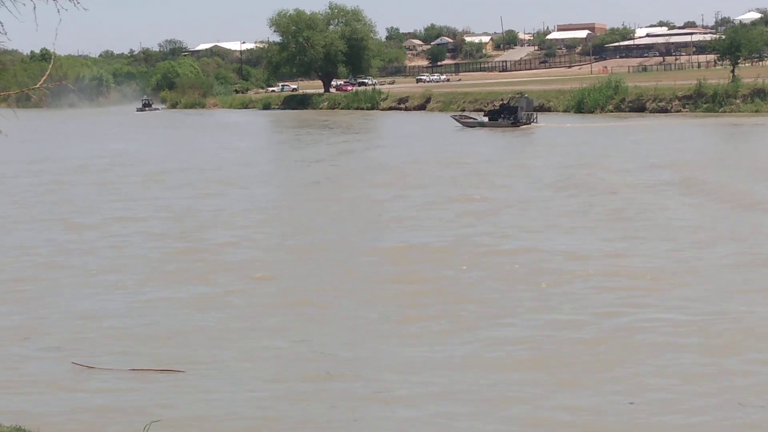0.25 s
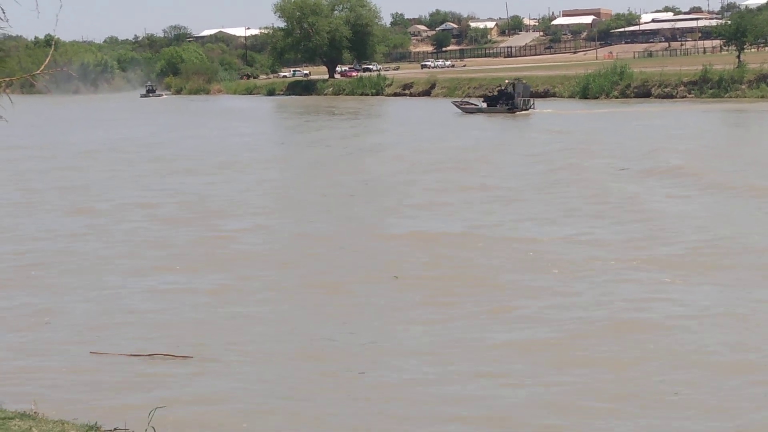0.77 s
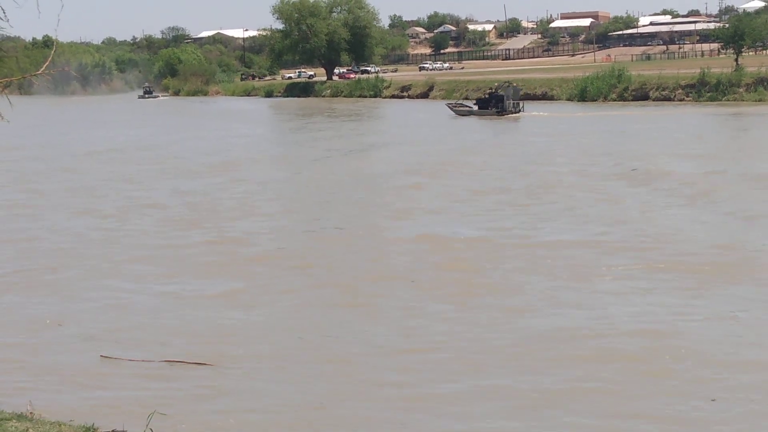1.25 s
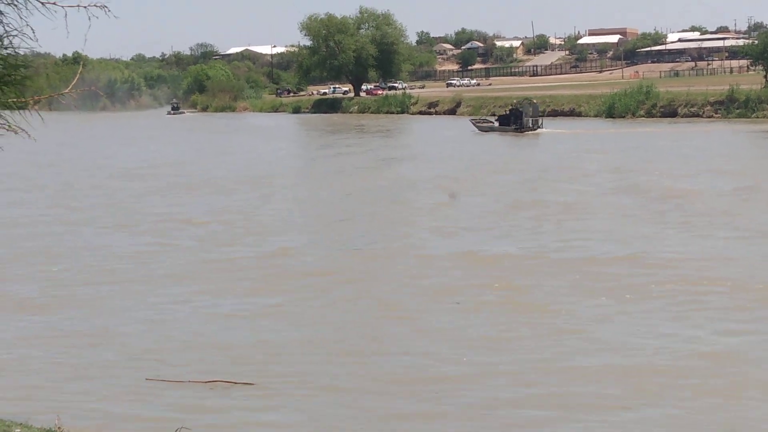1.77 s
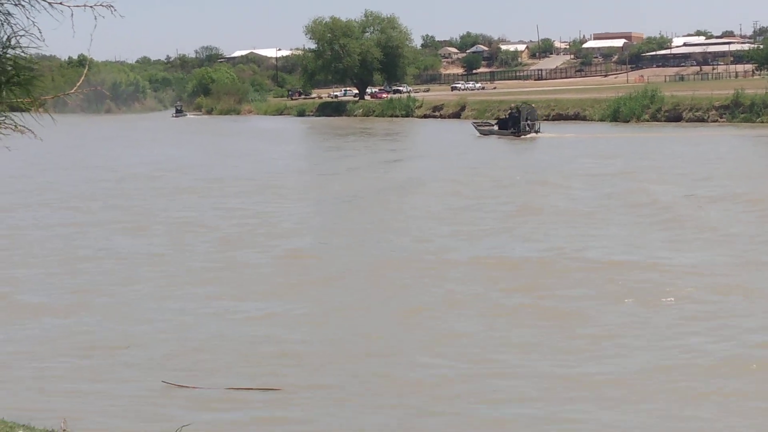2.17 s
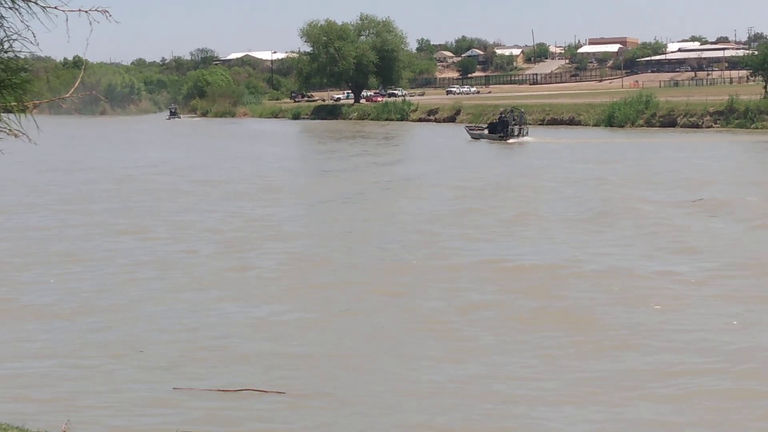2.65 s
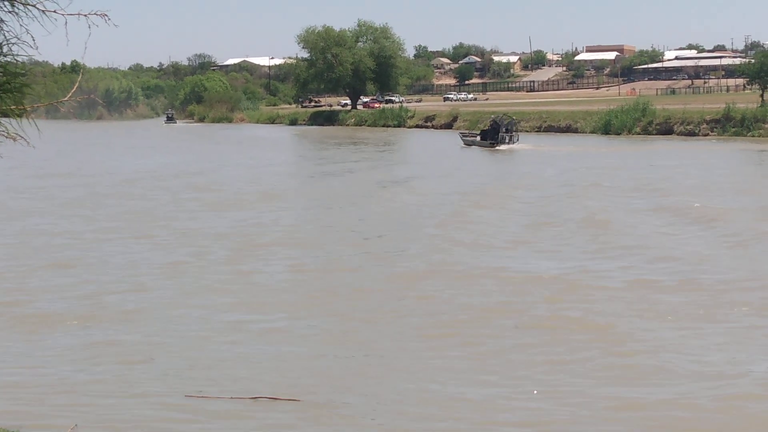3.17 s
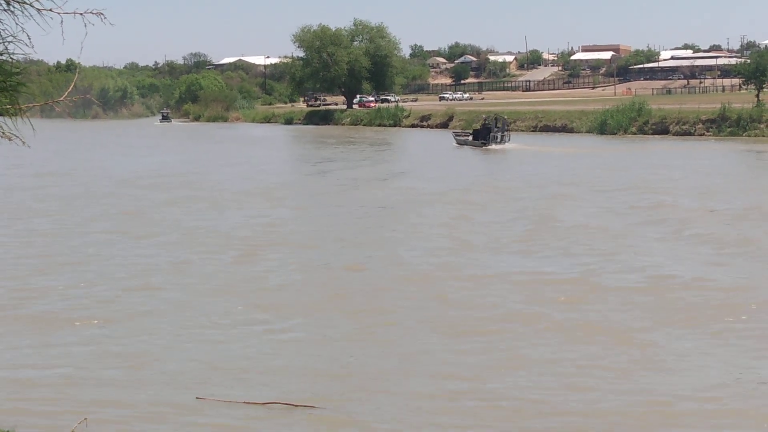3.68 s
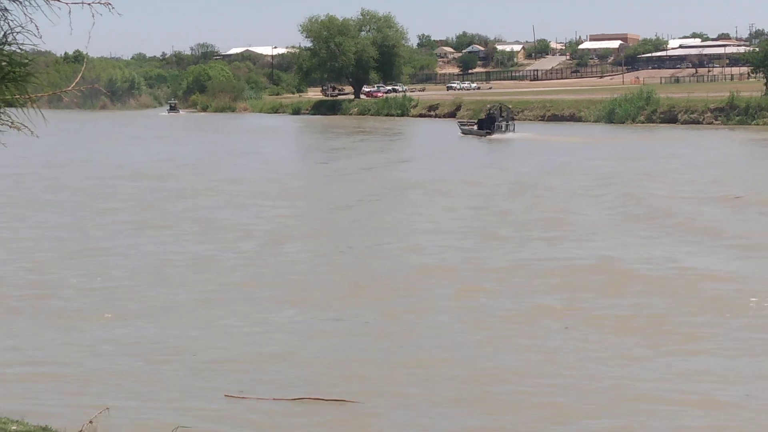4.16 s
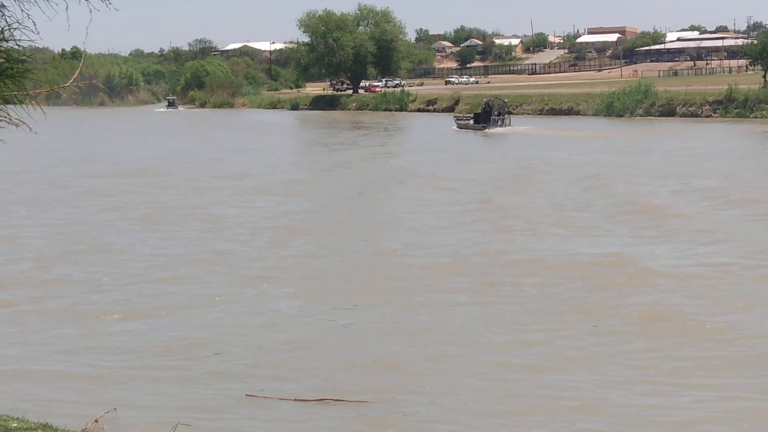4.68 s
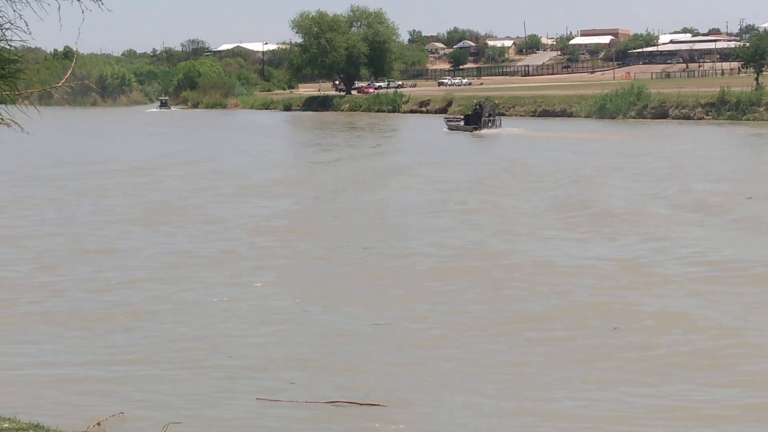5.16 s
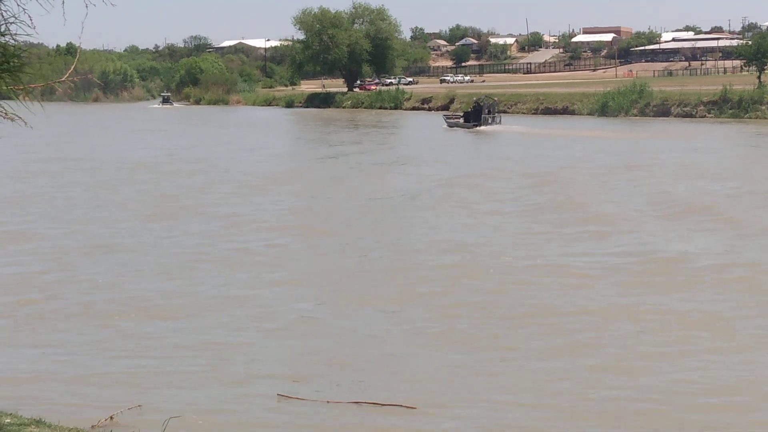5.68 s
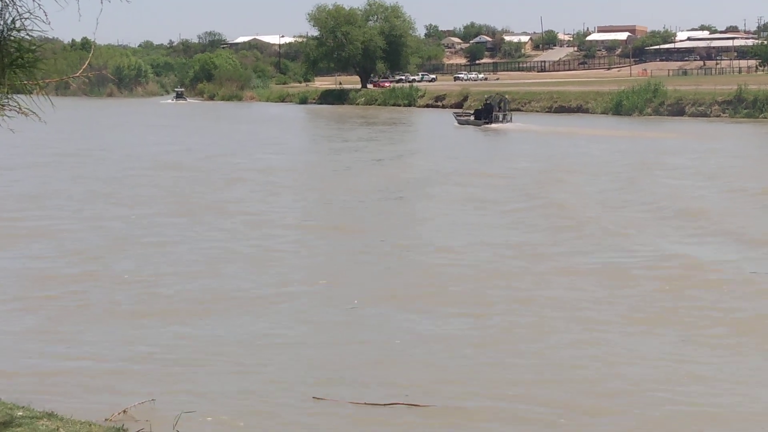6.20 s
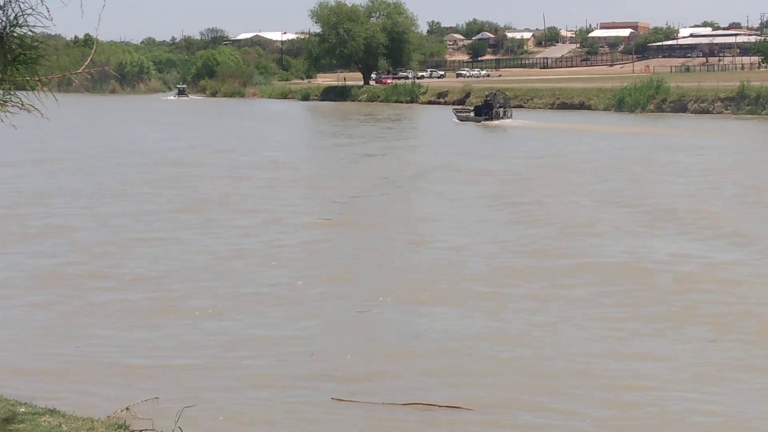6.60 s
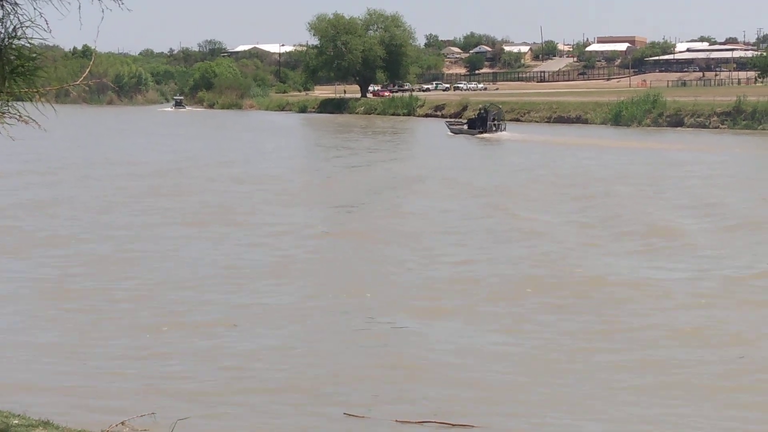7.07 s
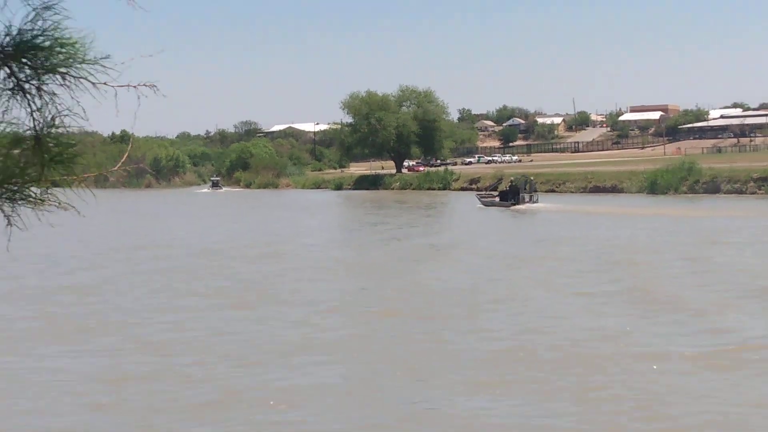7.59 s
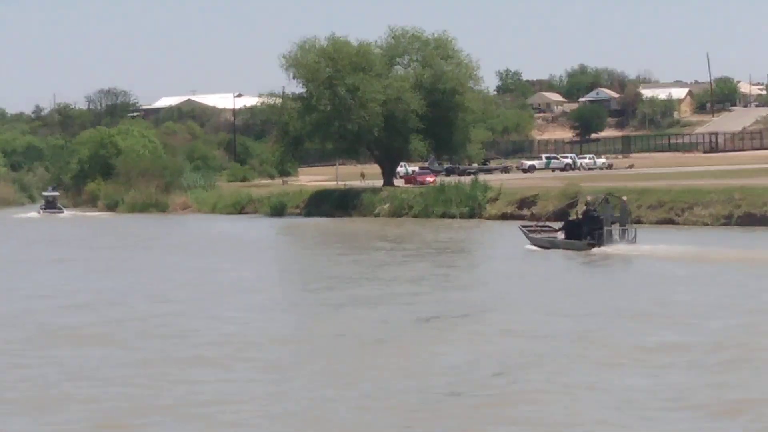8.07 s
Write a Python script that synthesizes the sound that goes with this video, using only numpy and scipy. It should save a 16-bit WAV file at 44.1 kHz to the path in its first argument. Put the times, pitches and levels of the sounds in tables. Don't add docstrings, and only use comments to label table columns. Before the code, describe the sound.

A distant airboat drones across a river, its throbbing engine and propeller slowly rising in pitch while wind buffets a hand-held microphone.

```python
import sys
import numpy as np
from scipy import signal
from scipy.fft import rfft, irfft
from scipy.io import wavfile
from scipy.ndimage import uniform_filter1d

SR = 44100
rng = np.random.default_rng(int(sys.argv[2]) if len(sys.argv) > 2 else 0)


def level_to_linear(level):
    exponent = np.asarray(level, float) / 20
    return 10 ** exponent


def pcm_store(signal):
    levels = np.round(np.clip(np.atleast_2d(signal), -1, 1) * 32767)
    wavfile.write(sys.argv[1], SR, levels.astype(np.int16).T)


N = 367794
T = np.arange(N) / SR
FRAME = 512
BLADES_PER_CYCLE = 3.49


def evened(x):
    return x / np.sqrt(np.mean(abs(x) ** 2) + 1e-20)


def read(points, hz):
    f, value = np.transpose(points)
    return np.interp(np.log(hz + 1), np.log(f + 1), value)


def curves(rows, t=T):
    s, *columns = np.transpose(rows)
    return np.array([np.interp(t, s, c) for c in columns])


def drift(rate_hz, count):
    step = 256
    knots = rng.standard_normal((count, N // step + 2))
    knots = uniform_filter1d(knots, max(int(SR / step / rate_hz / 2), 1), axis=1)
    knots = uniform_filter1d(knots, 3, axis=1)
    return [np.interp(T, np.arange(len(k)) * step / SR, evened(k)) for k in knots]


def field(frame, channels, bins_wide, frames_long):
    frames, hz = N // (frame // 4) + 5, np.fft.rfftfreq(frame, 1 / SR)
    a, b = rng.standard_normal((frames, len(hz), channels, 2)).T
    patches = rng.standard_normal((frames, len(hz), channels)).T
    patches = uniform_filter1d(patches, int(bins_wide), axis=1)
    patches = uniform_filter1d(patches, int(frames_long), axis=2)
    return hz, np.arange(frames) * (frame // 4) / SR, a + 1j * b, evened(patches)


def sound(z):
    frame = 2 * z.shape[-2] - 2
    return signal.istft(z, nperseg=frame, noverlap=frame - frame // 4)[1][..., :N]


# (t/s, engine cycles f/Hz)
ENGINE_SPEED = [(0, 17.48), (.4, 17.76), (.8, 17.96), (1.6, 18.212), (2.2, 18.31), (2.4, 18.348),
                (2.8, 18.531), (3.2, 18.675), (3.6, 18.96), (4.2, 19.4), (5, 19.85), (5.3, 19.98),
                (6.25, 20.18), (6.8, 20.144), (7.5, 20.168), (8.34, 20.131)]


def engine_hz():
    return curves(ENGINE_SPEED)[0]


# (t/s, level/dB)
HULL_HEADING = [(1.1, 3.5), (2.4, -1.5), (5, 1.5), (6.1, -4.5), (7.3, 1), (8.3, 4)]


def heading_db():
    return curves(HULL_HEADING)[0]


def pipe_swell():
    pipe_hz, width_hz = 201.5, 12.
    return np.exp(-(2 * (11 * engine_hz() - pipe_hz) / width_hz) ** 4)


# (t/s, firing level/dB, lope = unevenness of the two banks level/dB)
EXHAUST_LOAD = [(0, -23, 1), (1.2, -24, 2), (1.8, -25, -5.5), (2.2, -24.5, 1.5), (2.85, -21, -6),
                (3.35, -23, -2), (3.8, -23, 5.5), (4.2, -28.5, 3.5), (4.55, -23.5, -0.5), (5, -25.5, 6),
                (5.45, -22, -5), (6, -20.5, -4.5), (6.4, -22, 3.5), (7, -21, 0.5), (7.4, -22.5, 5),
                (7.9, -21, -2), (8.2, -24.5, 1)]
# (level/dB against firing, share of lope)
STRONG_ORDERS = [(-5.5, .25), (-4.5, 1.01), (0, 0.1), (-11.5, 0)]
SHUT_THROTTLE = [-4.5, -4.5, -18, 3.5]


def strong_orders():
    throttle_s, opening_s, pipe_db = .45, 1, 8.
    level_db, lope_db = curves(EXHAUST_LOAD)
    offset_db, share = np.transpose(STRONG_ORDERS)[:, :, None]
    shut = np.clip(1 - (T - throttle_s) / opening_s, 0, 1)
    out = level_db + offset_db + share * lope_db + np.outer(SHUT_THROTTLE, shut)
    out[0] += heading_db()
    out[3] += pipe_db * pipe_swell()
    return out


RIDING_ORDERS = {3: (0, -24.5), 4: (0, -41), 6: (2, -10.5), 9: (3, -4.5), 10: (3, -14.5), 12: (3, -40),
                 13: (3, -10.5), 15: (3, -23.5), 16: (3, -26.5), 18: (3, -22), 24: (3, -21.5)}
CYLINDER_PUFFS = [.8, 1.35, .98, .76, .7, .66, 1.5, 1.24]
PIPE_DELAY = [(8, 0), (9, 3.1), (11, .95)]


def exhaust(cycles):
    strong_db = strong_orders()
    orders = {5: (0, 0), 7: (1, 0), 8: (2, 0), 11: (3, 0), **RIDING_ORDERS}
    pattern, out = np.angle(np.fft.fft(CYLINDER_PUFFS)), np.zeros(N)
    for (k, (column, db)), flutter in zip(orders.items(), drift(1.8, count=len(orders))):
        angle = 2 * np.pi * k * (cycles + .0684) + pattern[k % 8] - curves(PIPE_DELAY, k)[0]
        if k == 11:
            angle = angle + .9 * pipe_swell()
        out += level_to_linear(strong_db[column] + db + 0.5 * flutter) * np.cos(angle)
    return np.sqrt(2) * out


# (t/s, level/dB, clarity of the air level/dB)
PROPELLER = [(0, -43.5, -8), (.4, -44.5, -7.5), (.93, -46, -1), (1.39, -49.5, 4), (1.69, -50.5, .5),
             (2.44, -46.5, 2.5), (2.69, -48, 4), (3.1, -46, -1.5), (3.6, -44.5, -5), (3.86, -45, 0.5),
             (4.2, -45, -1.5), (4.65, -45.5, 3.5), (5.06, -43, 0.5), (5.71, -47.5, 2.5), (6.7, -43, 3),
             (7.15, -40, -1), (7.92, -42, -0.5), (8.34, -42.5, 1)]


def propeller(t=T):
    return curves(PROPELLER, t)


# (f/Hz, level/dB)
SLAP_TONES = [(70, 2), (140, -1.5), (210, 12.5), (280, 7), (350, -0.5), (420, 6), (500, -8.5), (640, -1.5),
              (850, -6), (1100, -2.5), (1500, -10), (2500, -32.5), (4000, -34)]


def slaps(passes):
    level_db, swell_share, edge_share, null_share = -45.5, 0.21, 0.99, -0.53
    prop_db = propeller()[0]
    swell_db, hz = prop_db - prop_db.mean(), BLADES_PER_CYCLE * engine_hz()
    strength = level_to_linear(2.0 * rng.standard_normal(1000))[(passes + .5).astype(int)]
    shaken = passes + .008 * drift(25., count=1)[0]
    out = np.zeros(N)
    for k, fade, slip in zip(range(1, 41), drift(4.64, count=40), drift(1.5, count=40)):
        bright = 1 + (uniform_filter1d(strength, 150) - 1) * min(k / 8, 1)
        angle = 2 * np.pi * k * shaken + .4 * slip + np.pi / 2 - .012 * k ** 2
        tone_db = read(SLAP_TONES, k * hz)
        if k > 13:
            tone_db = tone_db + edge_share * swell_db - 3.2
        if k == 4:
            tone_db = tone_db + null_share * heading_db()
        out += level_to_linear(tone_db) * bright * level_to_linear(2.5 * fade) * np.cos(angle)
    return level_to_linear(level_db + swell_share * swell_db) * out


# (f/Hz, level/dB per Hz)
WASH_TONE = [(40, -5), (70, -20), (150, 15), (260, -3.5), (320, 4.5), (450, 0.5), (850, 0), (1150, -3.5),
             (1900, -9.5), (2500, -16), (4500, -15.5), (8000, -15), (10500, -22.5), (15700, -54.5)]
WASH_BANDS = [300, 775, 1900, 4600, 9200]
WASH_SHARES = [(-.3, -0.33), (.4, -0.076), (1.05, .05), (1.05, 1.02), (1.05, 1.24)]
# (f/Hz, share of wash arriving straight)
STRAIGHT_SHARE = [(60, .97), (500, .93), (1400, .92), (3000, .91), (7000, .87), (10000, .8), (15000, .4)]


def wash(passes):
    hz, t, z, patches = field(FRAME, channels=3, bins_wide=5.5, frames_long=20.0)
    level_db = np.array(WASH_SHARES) @ propeller(t)
    moves_db = level_db - level_db.mean(1)[:, None]
    shift_db = np.array([read(np.transpose([WASH_BANDS, row]), hz) for row in moves_db.T]).T
    x = evened(sound(z * level_to_linear(read(WASH_TONE, hz)[:, None] + 1.0 * patches + shift_db)))
    x *= 1 + 0.14 * np.cos(2 * np.pi * passes) + 0.078 * np.cos(4 * np.pi * passes)
    spectrum = level_to_linear(-34) * rfft(x)
    same = np.clip(read(STRAIGHT_SHARE, np.fft.rfftfreq(N, 1 / SR)), 0, 1)
    return irfft(same * spectrum[0], N), irfft(np.sqrt(1 - same ** 2) * spectrum[1:], N)


# (t/s, blade rate f/Hz, level/dB)
SECOND_BLADES = [
    (0, 119, -13),
    (.5, 115.8, -13.5),
    (.6, 112.3, -16),
    (.7, 107.5, -17),
    (.95, 89, -18),
    (1.1, 78, -25),
    (1.3, 70, -33),
    (1.6, 70, -50),
    (2.35, 99, -58),
]
# (multiple of blade rate, level/dB)
SECOND_OVERTONES = [(2, -5), (2.67, -16), (5, -23), (6, -25), (7, -22), (9, -37), (10, -39)]
REV_BLIP = (1.35, 1.8, 2.2, 2.35)
# (t/s, rms level/dB)
SPRAY_LEVEL = [(0, -49), (.2, -49), (.45, -44), (.6, -40), (.8, -47), (1.05, -49.5), (1.4, -67)]
# (f/Hz, level/dB per Hz)
SPRAY_COLOUR = [(300, -8), (700, -4.5), (2000, 9), (3300, 6.5), (5000, -6), (8000, -32), (12000, -52)]


def second_boat():
    lift_off_s, over_db, rasp_db, third_db, blip_db = .47, -11.5, 6.5, -23, -33
    hz, tone_db = curves(SECOND_BLADES)
    over_db = tone_db + over_db + rasp_db * np.clip((T - lift_off_s) / 0.064, 0, 1)
    third = level_to_linear(tone_db + third_db) + level_to_linear(blip_db) * np.interp(T, REV_BLIP, [0, 1, 1, 0])
    turns = 2 * np.pi * (np.cumsum(hz) / SR + .27)
    out = level_to_linear(tone_db) * np.cos(turns) + third * np.cos(3 * turns)
    for (k, db), fade in zip(SECOND_OVERTONES, drift(4.2, count=len(SECOND_OVERTONES))):
        dulled_db = 4 * (k > 5) * (T < lift_off_s + .04)
        level = level_to_linear(over_db + db + (1 + .12 * k) * fade - dulled_db)
        out += level * np.cos(k * turns + rng.uniform(0, 2 * np.pi))
    f, t, z, patches = field(FRAME, channels=2, bins_wide=5.5, frames_long=33.0)
    tone = level_to_linear(read(SPRAY_COLOUR, f)[:, None] + 0.98 * patches)
    spray = evened(sound((z + 0.84 * z[::-1]) * tone))
    spray *= level_to_linear(curves(SPRAY_LEVEL)[0]) * (1 + 0.13 * np.cos(turns))
    return (np.sqrt(2) * out * level_to_linear(np.array([[-.2], [.2]])) + spray) * (T < SECOND_BLADES[-1][0])


# (t/s, peak level/dB, sharpness level/dB)
WIND_GUSTS = [(0, -28.5, 9), (.07, -29.5, 6.5), (.35, -24.5, 1), (.6, -23, -6.5), (.8, -27.5, -9),
              (1.03, -21, -1.5), (1.25, -27.5, 2.5), (1.45, -24, 0.5), (1.65, -28.5, 3.5), (1.8, -21, -1),
              (2.02, -23.5, 4), (2.2, -23.5, 0), (2.479, -22.5, -2), (2.9, -32, -1.5), (3.1, -28, -1.5),
              (3.5, -22.5, -5), (3.7, -28, 5), (3.88, -28.5, 4), (4.15, -34.5, 15), (4.3, -30.5, -10),
              (4.43, -25, 4), (4.8, -25, 2), (5.13, -25, 1.5), (5.25, -33, 6.5), (5.5, -43, -12),
              (6, -32.5, 3), (6.6, -37.5, -12), (8.15, -33, -25), (8.32, -30.5, -23)]


def gusts(t):
    rise_db_per_s, fall_db_per_s, breeze_db, breeze_sharp_db = 59.5, 61, -40.5, -19
    s, peak_db, sharp_db = np.transpose(WIND_GUSTS)[:, :, None]
    power = level_to_linear(2 * (peak_db - np.maximum(rise_db_per_s * (s - t), fall_db_per_s * (t - s))))
    breeze = level_to_linear(2 * breeze_db)
    total = power.sum(0) + breeze
    return 10 * np.log10(total), ((power * sharp_db).sum(0) + breeze * breeze_sharp_db) / total


# (f/Hz, level/dB per Hz)
BUFFET_TONE = [(24, -42), (40, -31), (80, -14), (102, 10), (206, 1), (290, -6), (490, -19.5), (700, -31.5),
               (1200, -55), (2500, -110)]


def wind():
    pan_db = -1.1
    hz, t, z, lumps = field(2 * FRAME, channels=2, bins_wide=4.5, frames_long=9.9)
    level_db, sharp_db = gusts(t)
    reach = np.clip(np.log2(hz / 140 + 1e-9), 0, 1.6)[:, None]
    z = z + .12 * z[::-1]
    z = z * level_to_linear(read(BUFFET_TONE, hz)[:, None] + 2.06 * lumps + reach * (sharp_db + 1.5))
    return level_to_linear(np.interp(T, t, level_db) + 4.0 + pan_db / 2 * np.array([[1], [-1]])) * evened(sound(z))


# (t/s, peak level/dB, left-right level/dB, centre f/Hz)
CASE_TICKS = [
    (0.622, -58, -6, 10500),
    (3.991, -39, -3, 11700),
    (4.0711, -44, 1.0, 14500),
    (4.3294, -50, -7, 12700),
    (4.7765, -44, -8.0, 12400),
    (5.0439, -48, 1.5, 12400),
    (5.2355, -52, -3, 12700),
    (7.1352, -48, -28, 11500),
    (7.139, -46, -31, 12600),
    (7.141, -39, -31, 10600),
]
# (start t/s, end t/s, level/dB)
GRIP_RUBS = [
    (4.15, 5.2, -67.5),
    (6.25, 6.7, -68.5),
    (8.2, 8.4, -67),
]


def handling(order=2):
    rub_rise_s, rub_fall_s, hiss_db = .3, .25, -66.5
    out, t = np.zeros((2, N)), np.arange(160) / SR
    high = signal.butter(4, 10500, "high", fs=SR, output="sos")
    for (s, db, pan_db, hz), burst in zip(CASE_TICKS, rng.standard_normal((len(CASE_TICKS), 160))):
        band = signal.butter(order, [.65 * hz, min(0.98 * hz, 20000)], "band", fs=SR, output="sos")
        tick = evened(signal.sosfilt(band, burst)) * level_to_linear(db + 7 - 60 * t / 0.0046)
        out[:, round(s * SR):][:, :160] += tick * level_to_linear(np.array([[pan_db / 2], [-pan_db / 2]]))
    grains = rng.standard_normal((2, N)) * level_to_linear(3.6 * rng.exponential(1, N)) * (rng.random(N) < 2500 / SR)
    hiss = level_to_linear(hiss_db) * rng.standard_normal((2, N))
    rub = np.zeros(N)
    for a, b, db in GRIP_RUBS:
        rub += level_to_linear(db) * np.interp(T, [a - rub_rise_s, a, b, b + rub_fall_s], [0, 1, 1, 0]) ** 2
    return out + rub * evened(signal.sosfilt(high, grains)) + hiss


# (f/Hz, width f/Hz, level/dB)
BODY_COLOUR = [
    [(1292, 87, -17), (1677, 120, -11), (1912, 340, 7.5), (2420, 240, -0.5), (2870, 320, 8),
     (3260, 150, -5.5), (3910, 290, 9), (4300, 160, -7.5), (4750, 180, -0.5), (6240, 250, -1.5),
     (6580, 200, 6.5), (7750, 280, 2.5), (9960, 83, 0)],
    [(803, 73, 5), (1222, 208, -11), (2200, 110, -3), (3300, 115, -5), (3760, 340, 7.5), (4510, 560, 7.5),
     (4740, 110, -10.5), (5330, 84, 9.5), (5980, 230, 3.5), (7650, 200, -2), (8550, 250, 0.5),
     (10000, 180, -34.5)],
]
# (t/s, how fully it shades the ports 0-1, stretch of the colour as it moves)
HAND_GRIP = [
    (0, .9, 1),
    (1.2, 1, 1),
    (7.15, 1, .99),
    (7.58, 1, 1.06),
    (7.64, .2, 1.1),
    (7.7, .45, 1.36),
    (8.0, .45, 1.4),
    (8.08, .2, 1.1),
    (8.16, .7, 1),
]


def camera_body(x, depth):
    hz = abs(np.fft.fftfreq(4096, 1 / SR))
    f, t, z = signal.stft(x, SR, nperseg=2 * FRAME, noverlap=3 * FRAME // 2, boundary="even")
    grip, stretch = curves(HAND_GRIP, t)
    seen_hz = f[:, None] / stretch ** np.clip(f[:, None] / 1500 - 1, 0, 1)
    for side, bumps in enumerate(BODY_COLOUR):
        log_gain = np.log(level_to_linear(sum(db / (1 + (2 * (hz - mid) / w) ** 2) for mid, w, db in bumps)))
        log_filter = np.conj(signal.hilbert(log_gain))[:2049]
        z[side] *= np.exp(depth * np.clip(grip, 0, 1) * np.interp(seen_hz, hz[:2049], log_filter))
    left, right = sound(z)
    return np.array([np.r_[left[:1], left[:1], left[:-2]], right])


def scene():
    cycles = np.cumsum(engine_hz()) / SR
    passes = BLADES_PER_CYCLE * cycles + .4
    straight, scattered = wash(passes)
    near = (exhaust(cycles) + slaps(passes)) * level_to_linear(np.array([[-.9], [.9]]))
    near = near + straight * level_to_linear(np.array([[-.6], [.6]]))
    return camera_body(near, 1) + camera_body(scattered, .8) + second_boat() + wind() + handling()


def top_cut(x):
    return signal.sosfilt(signal.butter(12, 15740, fs=SR, output="sos"), x)


def record(dry):
    return top_cut(dry)


dry = scene()
out = record(dry)
pcm_store(out)
```